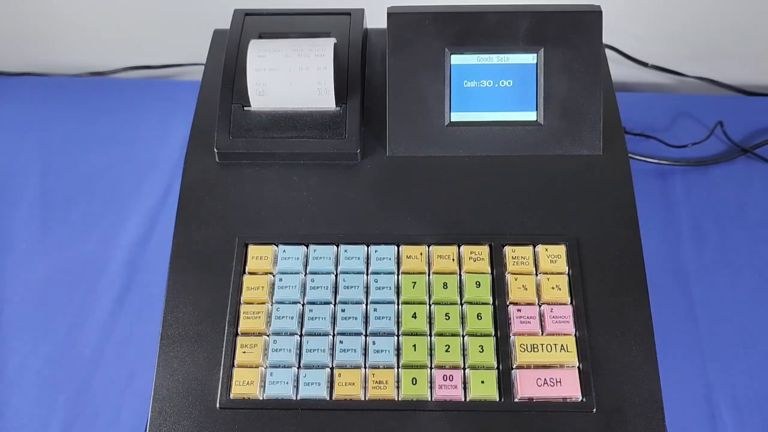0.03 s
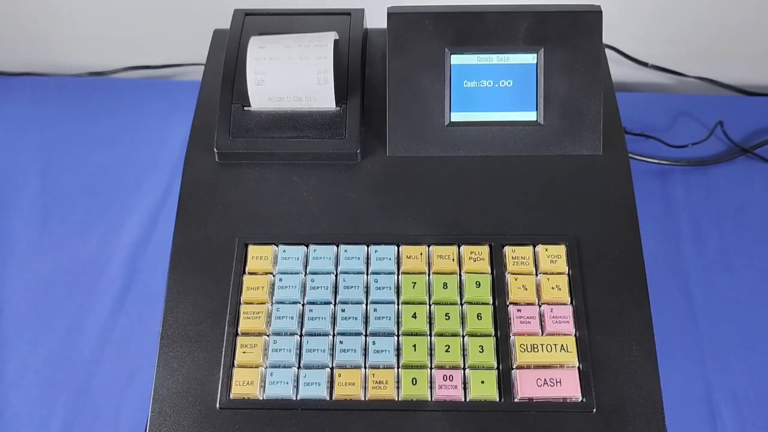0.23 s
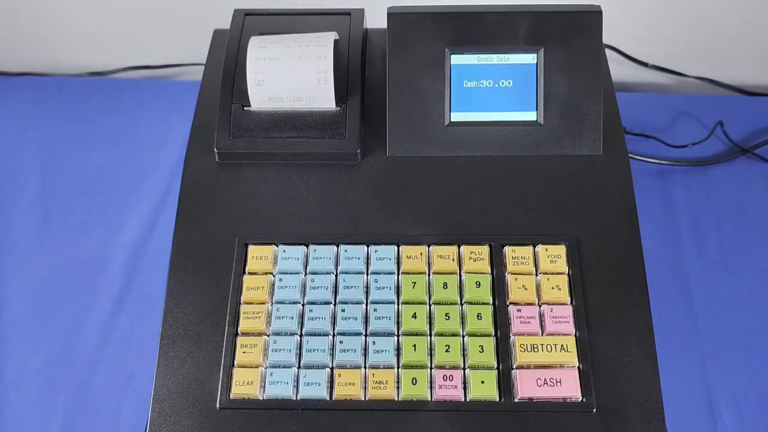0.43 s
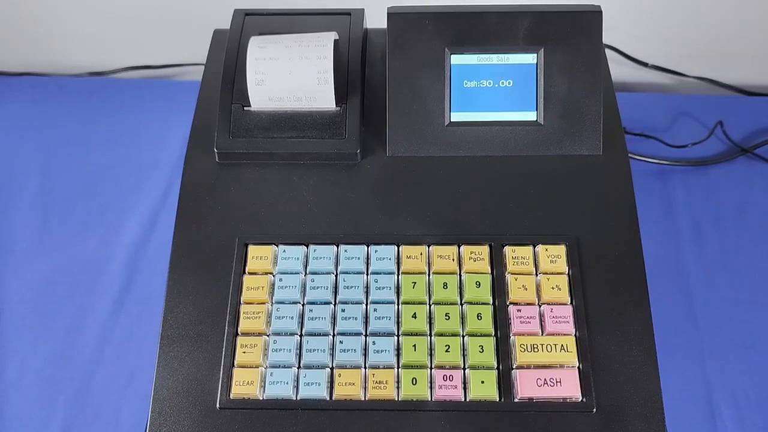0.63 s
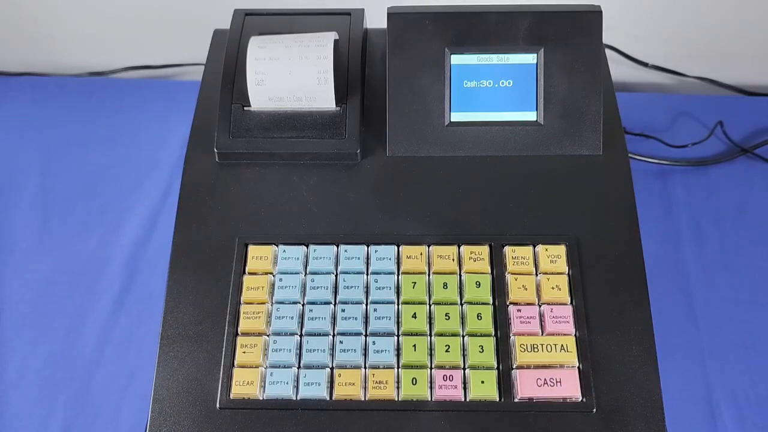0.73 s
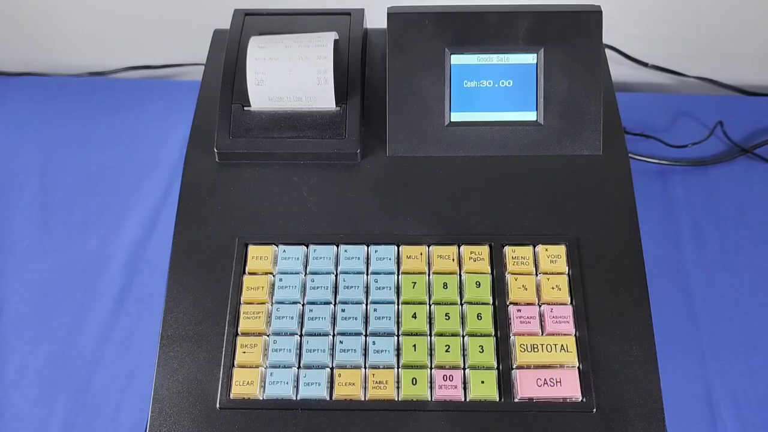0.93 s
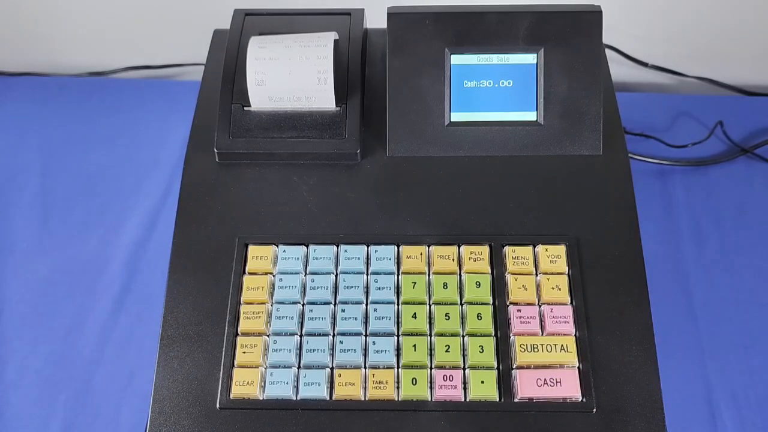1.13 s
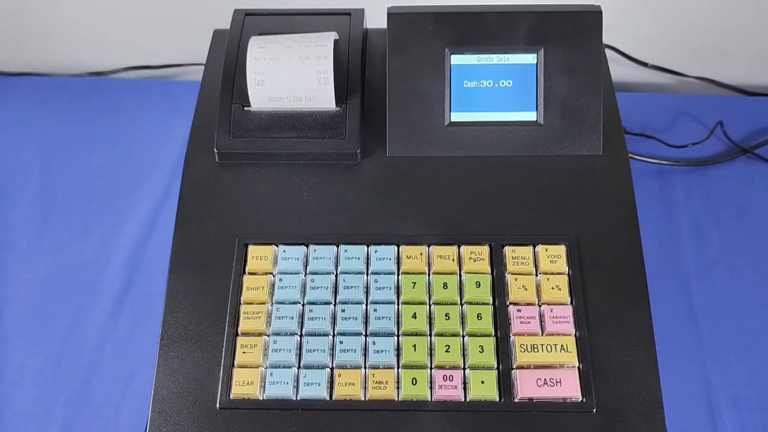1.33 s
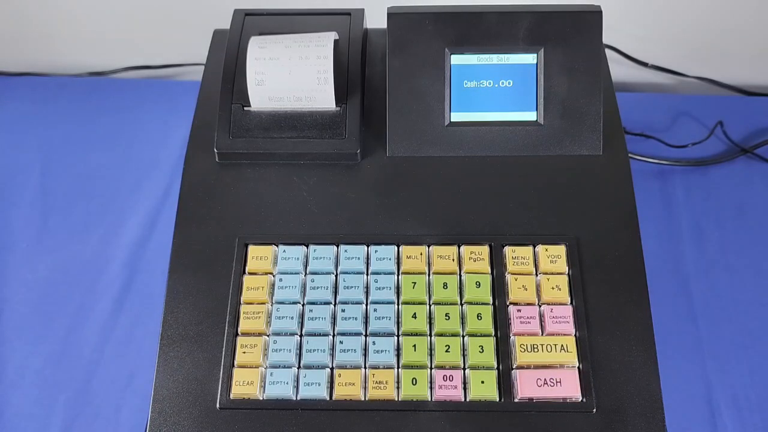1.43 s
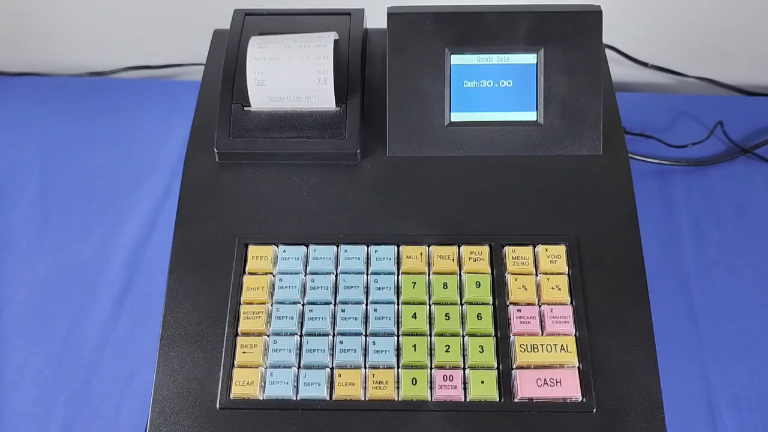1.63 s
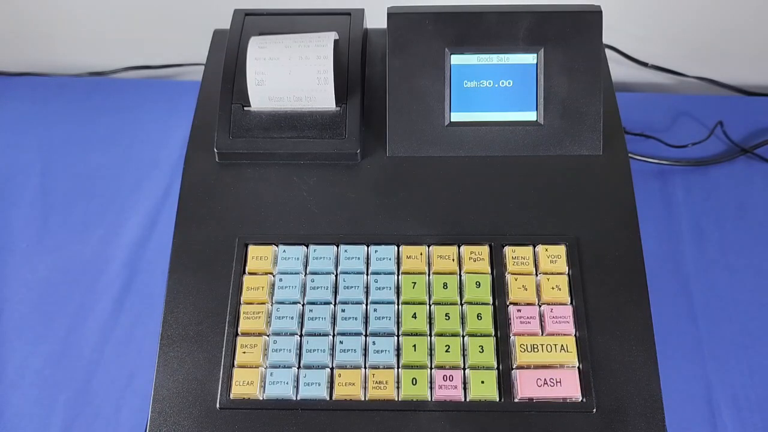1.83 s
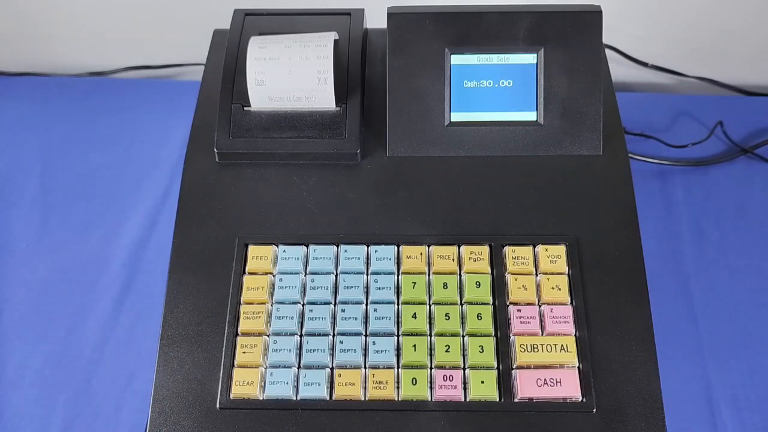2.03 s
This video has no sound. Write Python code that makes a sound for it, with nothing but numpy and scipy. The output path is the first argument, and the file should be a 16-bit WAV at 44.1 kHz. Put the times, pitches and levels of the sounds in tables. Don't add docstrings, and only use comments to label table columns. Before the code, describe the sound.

A receipt printer on a cash register runs from the start, a quiet steady motor whine near 1.2 kHz under gear and paper hiss. At 0.22 s a loud plastic clack chatters and the motor stops by about 0.25 s; a second, drier clack follows at 0.34 s. The bare room's reverberation fades over roughly half a second, leaving very faint, slightly wavering ventilation hum until 2 s.

```python
import sys
import numpy as np
from scipy import signal
from scipy.fft import rfft, irfft
from scipy.io import wavfile
from scipy.ndimage import uniform_filter1d

SR = 44100
rng = np.random.default_rng(int(sys.argv[2]) if len(sys.argv) > 2 else 0)


def volts(x):
    e = np.asarray(x, float) / 20
    return 10 ** e


def unload_wav(signal):
    wavfile.write(
        sys.argv[1],
        SR,
        np.round(np.clip(np.atleast_2d(signal).T, -1, 1) * 32767).astype(np.int16),
    )


N = 92610

# step_rate_multiple [x], level_db [dB]
WHINE_PARTIALS = [
    (1, -57),
    (2, -48),
    (7, -71.5),
    (8, -74.5),
    (15, -81),
]
# freq_hz [Hz], density_db [dB per Hz]
GEAR_SPECTRUM = [(59, -51), (100, -24.5), (1090, -13), (1180, -8.5), (1620, -18.5), (6950, -21),
                 (7890, -41), (8580, -33.5), (15500, -42)]
# freq_hz [Hz], density_db [dB per Hz]
HUM_SPECTRUM = [(15, -33), (25, -10.5), (82, -9.5), (102, -11), (206, 0.5), (528, -8.5), (648, -4.5),
                (838, -6), (1500, -10), (1950, -57), (3300, -120)]
# freq_hz [Hz], density_db [dB per Hz]
HISS_SPECTRUM = [(880, -37), (1500, -10.5), (1580, -2), (2180, -0.5), (4570, -12.5), (6910, -11),
                 (8170, -23), (12100, -14), (15800, -13)]
# start_s [s], length_s [s], pitch_hz [Hz], width_hz [Hz], level_db [dB]
DUCT_SWELLS = [
    (.92, .16, 310, 14, -64),
    (1.12, .2, 660, 25, -73),
    (1.41, .2, 655, 14, -71),
    (1.62, .13, 680, 40, -71),
    (1.3, .1, 235, 30, -68),
    (1.82, .1, 210, 30, -69),
]
# time_s [s], level_db [dB], contact_length_ms [ms]
FIRST_CONTACTS = [
    (0.2215, -38.5, .08),
    (0.2237, -31.5, .07),
    (0.2245, -13, .09),
    (.2265, -18, 0.18),
    (.2294, -31.5, 0.033),
    (.2335, -29, 0.34),
    (.2368, -14.5, 0.29),
    (.2415, -21, 0.11),
    (.2480, -23.5, 0.23),
    (.2570, -25.5, 0.15),
]
SECOND_CONTACTS = [
    (0.3385, -21, 0.12),
    (0.341, -15.5, .07),
    (0.3434, -14, 0.075),
    (0.3478, -16.5, .13),
    (0.355, -17.5, 0.079),
    (0.3608, -24.5, 0.17),
    (0.3649, -24.5, 0.13),
    (0.373, -31.5, 0.27),
    (.3840, -33.5, 0.3),
]
# pitch_hz [Hz], level_db [dB], t60_s [s]
FIRST_CASE_MODES = [(295, -16.5, .06), (696, -9, 0.058), (685, -20, 0.048), (1083, -15.5, 0.059),
                    (1460, -9, .06), (1757, -9, .05), (2120, -7, 0.043), (2420, -14, .04),
                    (3970, -14.5, .03), (4960, -13.5, .04), (6180, -17, .04), (7063, -2, 0.096),
                    (11664, -21, .03), (12660, -12.5, .03)]
SECOND_CASE_MODES = [(265, -12, 0.086), (597.5, -11.5, 0.062), (740, -14, .05), (1050, -11.5, 0.017),
                     (1366, -7.5, 0.043), (1830.4, -3.5, .04), (2102, -13.5, .04), (2804, -12, 0.034),
                     (3245, -16.5, .03), (4650, -17, .04), (6750, -21, .035), (8900, -18.5, .03),
                     (9780, -14.5, .05), (13294, -20, .02)]
# freq_hz [Hz], density_db [dB per Hz]
FIRST_RATTLE_SPECTRUM = [(88, -42), (150, -19.5), (686, -1.5), (1300, -11), (1780, -16), (6840, -17),
                         (7990, -28.5), (12000, -20.5), (15800, -68)]
SECOND_RATTLE_SPECTRUM = [(170, -33.5), (270, -12.5), (1100, -9.5), (2300, -13.5), (3500, -19.5),
                          (6700, -13.5), (10500, -27), (15800, -37)]
# level_db [dB], bass_t60_s [s], treble_t60_s [s]
RATTLE_DECAYS = [
    (-6.5, .05, 0.048),
    (-6.5, .045, .03),
]
# freq_hz [Hz], t60_s [s], level_db [dB]
ROOM_DECAY = [(253, 1, -5.5), (500, 0.46, -3.5), (1080, 0.88, -9.5), (2050, 0.87, -5.5), (3000, 0.7, -5.5),
              (5000, 0.21, -1.5), (8000, 0.38, -7), (13200, 0.69, -12.5)]

STEP_HZ, STEP_WOBBLE, WHINE_FLUTTER_DB = 588.6, .001, 1.5
MOTOR_STOP_S, MOTOR_RELEASE_S = 0.2475, 0.0043
GEARS_DB, GEAR_GRIT_DB, GEAR_PULSE = -47.5, 3.5, 0.1
HUM_DB, HUM_SWELL_DB, HUM_FLICKER_DB, HISS_DB = -63.5, .8, 1.6, -75.5
RATTLE_SPLIT_HZ, RATTLE_GRIT_DB = 1300, 0
ROOM_DELAY_S, ROOM_BUILD_S = 0.0021, 0.0067
CASE_LOW_HZ = 225
CASE_TO_ROOM = .3
MIC_DIP_HZ, MIC_DIP_WIDTH_HZ, MIC_DIP_DB = 8000, 380, -9
CEILING, TOP_HZ = .65, 16000
GATE_FROM_HZ, GATE_BINS, GATE_FRAME = 2400, 6, 2048
GATE_NEAR_DB, GATE_TILT_DB, GATE_ALL_DB = -6, 5.2, -53
GATE_CHANCE_DB, GATE_DEPTH_DB, GATE_ATTACK_DB = 2.8, -35, 9


def set_level(x, db):
    return x * volts(db) / np.sqrt(np.mean(x ** 2))


def gain_at(hz, spectrum):
    points = np.array(spectrum, float)
    freq_hz, db = points[:, 0], points[:, 1]
    return volts(np.interp(np.log(hz + 1e-9), np.log(freq_hz), db, left=db[0] - 20, right=db[-1] - 20))


def colour(x, spectrum):
    return irfft(rfft(x) * gain_at(np.fft.rfftfreq(N, 1 / SR), spectrum), N)


def ring(x, hz, width_hz):
    return signal.lfilter(*signal.iirpeak(hz, hz / width_hz, fs=SR), x)


def gritty(grit_db):
    size_db = grit_db * np.minimum(rng.exponential(size=N), 2)
    return rng.standard_normal(N) * volts(size_db)


def walk(rate_hz):
    hold = int(SR / rate_hz)
    steps = np.repeat(rng.standard_normal(N // hold + 1), hold)
    return 1.1 * uniform_filter1d(uniform_filter1d(steps, hold), hold)[:N]


def motor(t):
    phase = 2 * np.pi * np.cumsum(STEP_HZ * (1 + STEP_WOBBLE * walk(36))) / SR
    whine = 0
    for multiple, db in WHINE_PARTIALS:
        flutter = volts(db + WHINE_FLUTTER_DB * walk(40))
        whine = whine + np.sqrt(2) * flutter * np.sin(round(multiple) * phase)
    pulse = 1 + GEAR_PULSE * np.cos(phase)
    gears = set_level(colour(gritty(GEAR_GRIT_DB) * pulse, GEAR_SPECTRUM), GEARS_DB)
    run_down = np.exp(-np.clip(t - MOTOR_STOP_S, 0, None) / MOTOR_RELEASE_S)
    return (whine + gears) * run_down


def air(t):
    swell_db, hum = HUM_SWELL_DB * walk(0.83), 0
    for hz in 30 * 2 ** np.arange(0, 6, .5):
        band = ring(rng.standard_normal(N), hz, hz / 2) / np.sqrt(hz)
        hum = hum + band * volts(swell_db + HUM_FLICKER_DB * walk(22))
    hiss = set_level(colour(rng.standard_normal(N), HISS_SPECTRUM), HISS_DB)
    out = set_level(colour(hum * np.sqrt(2), HUM_SPECTRUM), HUM_DB) + hiss
    for start, length, hz, width, db in DUCT_SWELLS:
        envelope = np.sin(np.pi * np.clip((t - start) / length, 0, 1)) ** .5
        out = out + set_level(ring(rng.standard_normal(N), hz, width), db) * envelope
    return out


def clack(t, contacts, modes):
    share = rng.standard_normal((len(contacts), len(modes)))
    share = np.sign(share) * volts(2 * np.abs(share))
    pushes = [volts(db) * np.exp(-((t - start) * 1000 / ms) ** 2) / ms for start, db, ms in contacts]
    out = 0
    for k, (hz, db, t60) in enumerate(modes):
        drive = sum(push * share[i, k] for i, push in enumerate(pushes))
        width = np.log(1000) / np.pi / min(t60, .1)
        out = out + volts(db) * ring(drive, hz, width) * 100 / width
    return out


def rattle(t, contacts, decays, spectrum):
    db, t60_low, t60_high = decays
    knocks = set_level(colour(gritty(RATTLE_GRIT_DB), spectrum), db)
    low = signal.sosfilt(signal.butter(2, RATTLE_SPLIT_HZ, fs=SR, output="sos"), knocks)

    def fade(t60, brightness):
        power = 0
        for start, hit_db, ms in contacts:
            onset = np.clip((t - start) / .0007 + .5, 0, 1)
            decay_db = hit_db - 60 * np.clip(t - start, 0, None) / t60
            power = power + onset ** 2 * volts(2 * decay_db) * (.1 / ms) ** brightness
        return np.sqrt(power)

    return low * fade(t60_low, 0) + (knocks - low) * fade(t60_high, 2.3)


def room(x, t):
    late = np.clip(t - ROOM_DELAY_S, 0, None)
    tail = 0
    for hz, t60, db in ROOM_DECAY:
        octave = set_level(ring(ring(rng.standard_normal(N), hz, hz), hz, hz), db)
        tail = tail + octave * np.sqrt(hz / SR) * 0.027 * volts(-60 * late / t60)
    build = 1 - np.exp(-late / ROOM_BUILD_S)
    return signal.fftconvolve(x, tail * build)[:N]


def scene():
    t = np.arange(N) / SR
    steady = motor(t) + air(t)
    case = clack(t, FIRST_CONTACTS, FIRST_CASE_MODES) + clack(t, SECOND_CONTACTS, SECOND_CASE_MODES)
    loose = rattle(t, FIRST_CONTACTS, RATTLE_DECAYS[0], FIRST_RATTLE_SPECTRUM)
    loose = loose + rattle(t, SECOND_CONTACTS, RATTLE_DECAYS[1], SECOND_RATTLE_SPECTRUM)
    hits = case + loose + room(loose + CASE_TO_ROOM * case, t)
    small_case = signal.butter(3, CASE_LOW_HZ, "high", fs=SR, output="sos")
    return (signal.sosfilt(small_case, hits) + steady)[None]


def microphone(x):
    hz = np.fft.rfftfreq(N, 1 / SR)
    dip = volts(MIC_DIP_DB * np.exp(-((hz - MIC_DIP_HZ) / MIC_DIP_WIDTH_HZ) ** 4))
    limited = CEILING * np.tanh(x / CEILING)
    return irfft(rfft(limited) * dip * (hz < TOP_HZ), N)


def gate(x):
    hz, _, z = signal.stft(x, SR, nperseg=GATE_FRAME)
    edges = np.arange(0, len(hz), GATE_BINS)
    power = np.add.reduceat(np.abs(z) ** 2, edges) + 1e-20
    band_db = 10 * np.log10(uniform_filter1d(power, size=2, axis=1))
    whole_db = 10 * np.log10(power.sum(0))
    chance = uniform_filter1d(rng.standard_normal(band_db.shape), size=2, axis=1) * np.sqrt(2)
    tilt_db = GATE_TILT_DB * np.minimum(hz[edges] / 7000, 1)[:, None]
    near_db = uniform_filter1d(band_db, size=15, axis=0) + GATE_NEAR_DB + tilt_db
    shut = band_db + GATE_CHANCE_DB * chance < np.maximum(near_db, whole_db + GATE_ALL_DB)
    attack = whole_db - np.roll(whole_db, 1) > GATE_ATTACK_DB
    attack = attack | np.roll(attack, -1)
    shut = shut & ~attack & (hz[edges] > GATE_FROM_HZ)[:, None]
    shut_bins = shut[np.arange(len(hz)) // GATE_BINS]
    return signal.istft(z * volts(GATE_DEPTH_DB * shut_bins), SR, nperseg=GATE_FRAME)[1][:N]


def top_cut(x):
    return signal.sosfilt(signal.butter(12, 16020, fs=SR, output="sos"), x)


def record(dry):
    mix = gate(microphone(dry[0]))[None]
    return top_cut(mix)


dry = scene()
out = record(dry)
unload_wav(out)
```